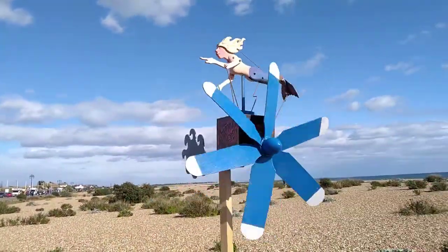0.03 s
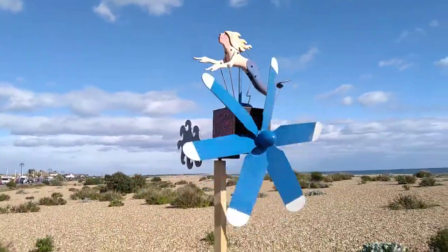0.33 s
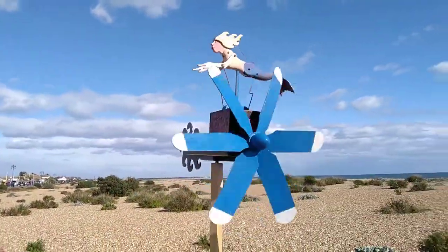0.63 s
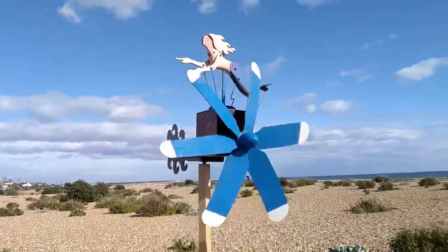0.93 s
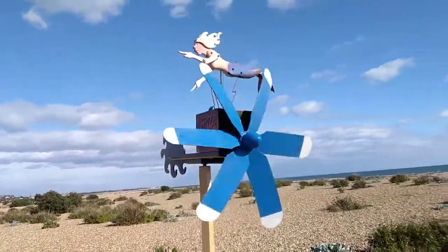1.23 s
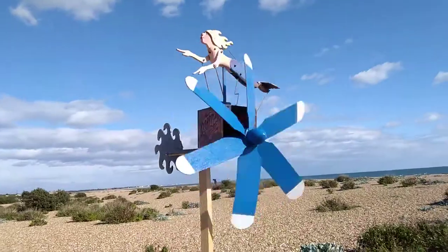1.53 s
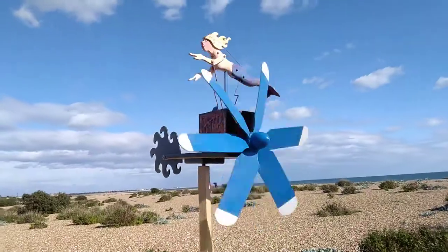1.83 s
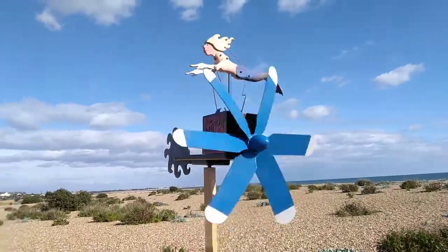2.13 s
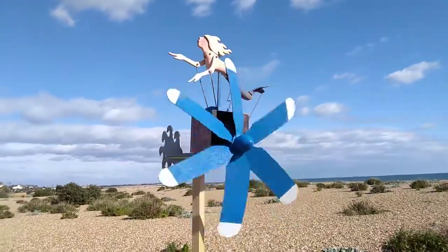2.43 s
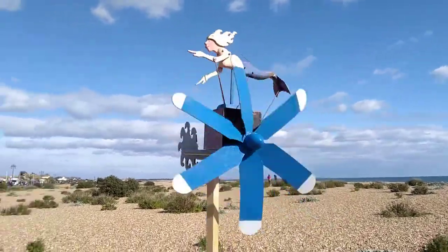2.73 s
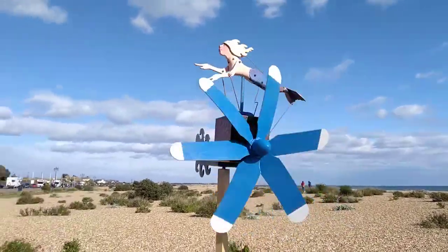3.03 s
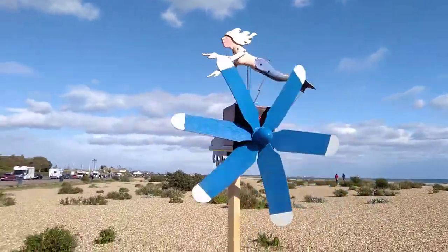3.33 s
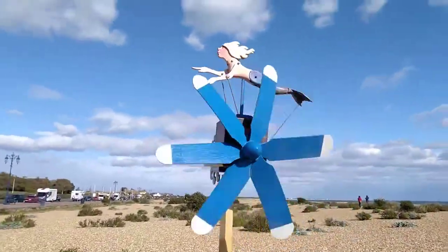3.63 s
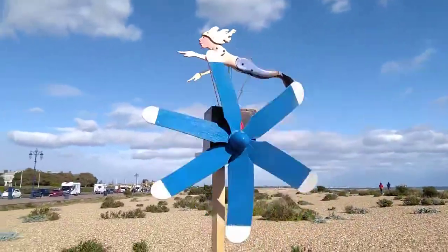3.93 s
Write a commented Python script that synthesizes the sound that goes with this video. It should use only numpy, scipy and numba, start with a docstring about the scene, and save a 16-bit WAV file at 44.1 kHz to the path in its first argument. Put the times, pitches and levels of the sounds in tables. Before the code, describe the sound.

Wind buffets the microphone with a distorted roar, over a whirligig's faint rubbing and ticking.

```python
"""A hard, crackling roar comes first: strong gusts on a shingle beach hit a microphone's two ports
(its openings). Eddies, small swirls of air, buffet each port and overload it, the right one nearly
all the time, which turns the roar to crackle. In two short lulls a rumble is left.
Close by, a wooden whirligig turns in the wind: its crank and wires rub and tick faintly."""
import sys
import numpy as np
from scipy import signal
from scipy.fft import rfft, irfft
from scipy.io import wavfile
from numba import njit

SR = 44100
rng = np.random.default_rng(int(sys.argv[2]) if len(sys.argv) > 2 else 0)


def inscribe(sig):
    """Save sig as 16-bit PCM at rate SR to the path in sys.argv[1].

    A 1-D sig is mono; a 2-D sig holds one channel per row.
    Samples are clipped to [-1, 1] before scaling.
    """
    pcm = np.round(np.clip(np.atleast_2d(sig).T, -1, 1) * 32767)
    wavfile.write(sys.argv[1], SR, pcm.astype(np.int16))


N = 176400

# Levels in the tables are relative. Gusts on the right port: (time [s], pressure [dB], eddy pitch [Hz])
RIGHT_GUSTS = [(0, 1, 313), (0.11, -5.5, 243), (0.22, -6, 220), (0.335, -5.5, 306), (0.41, -1, 256),
               (0.47, -1, 292), (0.535, -2.5, 427), (0.603, -9, 490), (0.616, 0.5, 524), (0.665, -0.5, 474),
               (0.705, 1, 420), (0.76, -8.5, 324), (0.815, -4, 358), (0.9, -4, 373), (0.935, -8, 465),
               (0.99, -3.5, 437), (1.08, -7.5, 520), (1.13, -3, 336), (1.24, -4.5, 420), (1.332, -5, 400),
               (1.348, -26, 270), (1.419, -53, 280), (1.431, -5.5, 377), (1.455, -6, 335),
               (1.468, -30, 300), (1.485, -27.5, 294), (1.503, -17, 230), (1.535, -9.5, 257),
               (1.583, -23, 220), (1.595, -6, 320), (1.63, -9, 366), (1.74, 0.5, 323), (1.83, 3, 230),
               (1.93, -3, 440), (1.96, -22.5, 370), (1.985, 0.5, 390), (2.12, 1, 260), (2.28, 1.5, 466),
               (2.37, -3.5, 480), (2.505, 3.5, 493), (2.545, -7.5, 460), (2.578, -10.5, 353),
               (2.598, -19, 229), (2.64, -31, 226), (2.657, -11.5, 302), (2.708, -24, 282),
               (2.722, -5.5, 295), (2.736, -7.5, 280), (2.752, -40, 200), (2.819, -33, 278),
               (2.828, -1.5, 338), (2.885, -6, 386), (2.91, -2.5, 438), (3.02, 2, 280), (3.13, 0, 398),
               (3.17, 9, 364), (3.255, 7.5, 390), (3.29, 1, 487), (3.37, -7.5, 570), (3.42, -0.5, 496),
               (3.68, 2, 510), (3.725, -7.5, 483), (3.772, -13.5, 467), (3.786, -4, 556), (4, 2.5, 435)]
# Gusts on the sheltered left port: (time [s], pressure [dB])
LEFT_GUSTS = [(0.0, -25.5), (0.25, -24.5), (0.28, -28.5), (0.71, -18), (0.85, -33.5), (0.91, -25.5),
              (1.12, -21.5), (1.16, -30.5), (1.34, -29), (1.41, -20.5), (1.48, -31.5), (1.51, -19),
              (1.59, -25.5), (1.67, -45), (1.69, -31.5), (1.84, -19.5), (2.01, -25.5), (2.13, -19),
              (2.17, -23.5), (2.26, -22.5), (2.41, -32), (2.54, -22), (2.65, -25.5), (2.79, -23),
              (2.86, -29), (2.9, -26.5), (3.28, -15.5), (3.31, -27.5), (3.43, -18), (3.59, -20.5),
              (3.63, -16), (3.81, -23.5), (3.84, -18.5), (4.0, -20.5)]
# Single eddies slap the right port: (time [s], length [s], extra pressure [dB])
EDDY_SLAPS = [(0.097, 0.0048, 8.5), (0.197, 0.0049, 4.5), (0.316, 0.0052, 4), (0.513, 0.0029, 2),
              (0.626, 0.027, 1.5), (0.668, 0.0082, 5), (0.812, 0.0042, 1), (0.946, 0.01, 8),
              (1.480, 0.0052, 19), (1.527, 0.0047, 6.5), (1.597, .009, 6.5), (1.738, 0.01, 2),
              (1.848, 0.002, 5), (2.656, 0.0075, 0.5), (2.721, .006, 3), (3.038, 0.0038, -2),
              (3.267, .007, 8), (3.794, 0.0091, 5)]
# The flow breaks off the right port for a moment: (time [s], length [s], pressure lost [dB])
FLOW_BREAKS = [(0.107, 0.0042, -1), (0.163, 0.0054, 10), (0.206, 0.0068, 0), (0.292, 0.0078, 3),
               (0.482, 0.006, 4), (0.797, 0.0033, 12), (0.862, 0.0088, 6.5), (0.961, 0.015, 7),
               (1.012, 0.0072, 8), (1.143, 0.006, 10), (1.27, 0.0076, 5.5), (1.609, 0.012, 4),
               (1.635, 0.0081, 5.5), (1.705, 0.015, 4), (2.432, 0.03, 4), (2.849, 0.0033, 7.5)]
# Rumble of large eddies: (frequency [Hz], level [dB])
RUMBLE_SPECTRUM = [(15, -8), (35, -5.5), (70, -8.5), (130, -10), (250, -18.5), (500, -26), (1000, -45),
                   (2000, -86)]
# Sizzle of an overloaded port: (frequency [Hz], level [dB])
SIZZLE_SPECTRUM = [(800, 8), (2500, 13), (5000, 8.5), (9000, 0.5), (12500, -6.5), (15000, -32)]
# Far wind and surf: (frequency [Hz], level [dB])
BEACH_SPECTRUM = [(500, 15), (2000, 8.5), (5000, -11), (11000, -13), (13000, -27), (15000, -33)]
# The whirligig's crank rubs: (start [s], length [s], level [dB], share of shrill scraping [0-1])
CRANK_RUBS = [(0.217, 0.041, -44.5, 0.9), (.32, 0.2, -57, .3), (0.537, 0.081, -46, .2),
              (.63, 0.26, -59, 0.1), (0.897, 0.16, -46, 0.07), (1.074, 0.078, -40, 0.3),
              (1.154, 0.17, -53.5, 0.1), (1.382, 0.02, -47, .3), (1.42, 0.03, -42.5, .3),
              (1.532, 0.062, -38, .35), (1.604, 0.19, -55, 0), (1.928, 0.061, -43, 0.4),
              (2.05, 0.3, -51, 0.16), (2.336, 0.26, -49.5, 0.4), (2.496, 0.15, -46.5, 0.26),
              (2.652, 0.16, -55, 0.64), (2.87, 0.086, -47, 0.2), (2.988, 0.096, -45, .4),
              (3.11, 0.19, -44.5, .2), (3.393, 0.14, -50, .2), (3.51, 0.19, -42, 0.4),
              (3.769, 0.11, -45, 0.3)]
# Rustle of rubbing wood: (frequency [Hz], level [dB])
WOOD_SPECTRUM = [(1800, 3), (2600, 4), (3600, 8.5), (4500, 4.5), (6500, 2.5), (10000, -4.5), (12500, -3),
                 (13500, -18), (16000, -36)]
# Rasp of scraping wires: (frequency [Hz], level [dB])
WIRE_SPECTRUM = [(4500, -12), (6300, -1.5), (9500, 2), (11000, 0), (12500, -11)]
# Ticks of the whirligig's linkage: (time [s], level [dB])
LINKAGE_TICKS = [(.866, -16), (1.287, -33), (1.423, -20.5), (2.518, -21), (2.728, -27), (2.802, -33),
                 (3.002, -20), (3.542, -25)]
# Tones the linkage rings with: (frequency [Hz], level [dB], time to fade by 60 dB [s])
LINKAGE_TONES = [(4050, -10, .007), (5300, -15, .007), (6650, -3, 0.0059), (7600, -9, .006),
                 (8800, -8, 0.0055), (10500, -5, 0.0039), (12500, -27, 0.0045)]

TIME = np.arange(N) / SR


def from_db(db):
    """Turn decibels into a gain to multiply by."""
    return 10 ** (np.asarray(db) / 20)


def unit_level(x):
    """Scale a signal so that its average power is 1."""
    return x / np.sqrt(np.mean(x ** 2) + 1e-20)


def in_time(rows):
    """Join a table's points with straight lines: one curve for each column after the time."""
    times, *columns = np.transpose(rows)
    return [np.interp(TIME, times, column) for column in columns]


def colour(x, spectrum):
    """Make some frequencies stronger than others; the result has power 1."""
    hz, db = np.transpose(spectrum)
    grid_hz = np.maximum(np.fft.rfftfreq(N, 1 / SR), 1)
    gain = from_db(np.interp(np.log(grid_hz), np.log(hz), db))
    return unit_level(irfft(rfft(x) * gain, N))


def keep(x, hz, order=1, kind="low"):
    """Keep what lies below hz ("low"), above it ("high") or between two values ("band")."""
    return signal.sosfilt(signal.butter(order, hz, kind, fs=SR, output="sos"), x)


def drift(rate_hz):
    """A smooth random wobble, about 1 in size."""
    return unit_level(keep(rng.standard_normal(N + SR), rate_hz, order=2)[SR:])


@njit
def sweep(x, tuning, damping):
    """A resonance whose centre and width move; returns the band at its centre and the lows."""
    band, low = np.zeros(len(x)), np.zeros(len(x))
    band_memory, low_memory = 0., 0.
    for i in range(len(x)):
        step = tuning[i]
        band[i] = (band_memory + step * (x[i] - low_memory)) / (1 + step * (step + damping[i]))
        low[i] = low_memory + step * band[i]
        band_memory, low_memory = 2 * band[i] - band_memory, 2 * low[i] - low_memory
    return band, low


def eddies(pitch_hz, damping, reach, fine_db, regular_below_hz=574):
    """Swirling air: noise strongest near its pitch, fading steeply above `reach` times that pitch."""
    tuning = np.pi * pitch_hz / SR
    # Slow eddies are more regular, so their hump in the spectrum is narrower.
    width = damping * np.minimum(pitch_hz / regular_below_hz, 1) ** 0.93
    hump = sweep(rng.standard_normal(N), tuning, width)[0] * np.sqrt(width / tuning)
    body = sweep(hump, tuning * reach, np.full(N, np.sqrt(2)))[1]
    return unit_level(body + from_db(fine_db) * hump)  # fine eddies add a little treble


def rumble(wind_db, level_db, follows):
    """Large eddies rumble, following a share of the wind's rise and fall."""
    swing_db = follows * (wind_db - wind_db.mean())
    return from_db(level_db + swing_db) * colour(rng.standard_normal(N), RUMBLE_SPECTRUM)


def overloaded_port(pressure, wind_db, top_hz, limit=0.42, hardness=7.5):
    """A port flattens pressure peaks; while overloaded it sizzles and is deaf to the far beach."""
    passed = (1 + np.abs(pressure / limit) ** hardness) ** (-1 / hardness)  # near 1 in light wind
    flattened = keep(pressure * passed, top_hz, order=2)
    sizzle_db = -32 + 0.17 * wind_db + 2 * drift(69)
    sizzle = (1 - passed) * from_db(sizzle_db) * colour(rng.standard_normal(N), SIZZLE_SPECTRUM)
    beach = passed ** hardness * from_db(-51.5) * colour(rng.standard_normal(N), BEACH_SPECTRUM)
    return keep(flattened + sizzle + beach, hz=13200, order=10)


def right_port(exposure_db=-1.5, octaves_per_db=0.06, flutter_octaves=0.15):
    """This port faces the wind: slaps push its roar up in level and pitch, breaks pull it down."""
    gust_db, eddy_hz = in_time(RIGHT_GUSTS)
    jolt_db = bumps(EDDY_SLAPS) - bumps(FLOW_BREAKS)
    wind_db = gust_db + jolt_db + exposure_db
    pitch_hz = eddy_hz * 2 ** (octaves_per_db * jolt_db + flutter_octaves * drift(73.4))
    buffeting = from_db(wind_db) * eddies(pitch_hz, damping=2.14, reach=1.72, fine_db=-30)
    pressure = buffeting + rumble(wind_db, level_db=-13, follows=0.48)
    return overloaded_port(pressure, wind_db, top_hz=12500)


def left_port(exposure_db=4, octaves_per_db=0.09, flutter_db=1, flutter_octaves=0.47):
    """The sheltered port is muffled: mostly rumble, now and then overloaded."""
    gust_db, = in_time(LEFT_GUSTS)
    wind_db = gust_db + exposure_db
    eddy_hz = 323 * 2 ** (octaves_per_db * (gust_db + 14))  # eddies quicken as the wind rises
    flutter = drift(38.5)  # makes the buffeting louder and higher at once
    pitch_hz = eddy_hz * 2 ** (flutter_octaves * flutter)
    strength = from_db(wind_db + flutter_db * flutter)
    buffeting = strength * eddies(pitch_hz, damping=5.8, reach=2.19, fine_db=-39)
    pressure = buffeting + rumble(wind_db, level_db=-18, follows=0.91)
    return overloaded_port(pressure, wind_db, top_hz=2600)


def bumps(rows):
    """Short bell-shaped swells, in dB at every sample."""
    return sum(db * np.exp(-np.minimum(np.abs(2 * (TIME - centre) / length), 6) ** 2 / 2)
               for centre, length, db in rows)


def crank_rubs(slips_per_s=7500, axle_db=-65.5, right_db=-1, attack_s=0.02, release_s=0.051):
    """A rub is many tiny slips under an uneven force: wood rustles, wire scrapes, hard rubs squeal."""
    wood_gain, wire_gain, squeal_gain = from_db(axle_db), 0, 0  # the axle rustles all the time
    for start, length, db, shrill in CRANK_RUBS:
        rise = (TIME - start) / attack_s
        fall = (start + length - TIME) / release_s + 0.5
        touch = np.clip(np.minimum(rise, fall), 0, 1)
        wood_gain += touch * from_db(db) * np.sqrt(1 - shrill)
        wire_gain += touch * from_db(db) * np.sqrt(shrill)
        squeal_db = -55 + 3.2 * (db + 41)  # grows much faster than the rub itself
        squeal_gain += touch ** 2 * from_db(squeal_db) * (1 - shrill)
    slips = rng.random(N) < slips_per_s / SR
    sides = []
    for side_db in (0, right_db):
        wood = wood_gain * colour(slips * rng.standard_normal(N), WOOD_SPECTRUM)
        wire = wire_gain * wire_scrape(slips)
        squeal = squeal_gain * slip_band(slips, low_hz=14050, high_hz=14750)
        sides.append(from_db(side_db) * (wood + wire + squeal))
    uneven_force = from_db(2.5 * drift(27))
    return np.array(sides) * uneven_force


def wire_scrape(slips, bands=24, uneven_db=5.5, uneven_hz=30):
    """Slips on the wires make a broad rasp; each band of it swells and fades on its own."""
    edges_hz = np.linspace(WIRE_SPECTRUM[0][0], WIRE_SPECTRUM[-1][0], bands + 1)
    rasp = 0
    for low_hz, high_hz in zip(edges_hz, edges_hz[1:]):
        swell = from_db(uneven_db * np.minimum(drift(uneven_hz), 2))
        rasp += swell * slip_band(slips, low_hz, high_hz)
    return colour(rasp, WIRE_SPECTRUM)


def slip_band(slips, low_hz, high_hz):
    """Slips of random strength, heard in one band of frequencies; the result has power 1."""
    return unit_level(keep(slips * rng.standard_normal(N), [low_hz, high_hz], order=2, kind="band"))


def linkage_ticks(contact_s=0.0036, gain_db=-6, right_db=-4):
    """A short, rough contact makes the linkage ring."""
    contact = sum(from_db(db + gain_db) * (TIME >= start) * np.exp(-np.abs(TIME - start) / contact_s)
                  for start, db in LINKAGE_TICKS)
    force = contact / np.sqrt(contact_s * SR / 2) * rng.standard_normal((2, N)) + 1e-18
    ringing = np.zeros((2, N))
    for hz, db, fade_s in LINKAGE_TONES:
        decay, angle = from_db(-60 / (fade_s * SR)), 2 * np.pi * hz / SR  # both per sample
        feedback = [1, -2 * decay * np.cos(angle), decay ** 2]
        ringing += from_db(db) * signal.lfilter([0, np.sin(angle)], feedback, force)
    return ringing * from_db([[0], [right_db]])


def scene():
    """Wind on both ports, with the whirligig close by."""
    return np.array([left_port(), right_port()]) + crank_rubs() + linkage_ticks()


def record(dry, threshold_db=-18.5, cut_per_db=0.62, reaction_s=0.021, top_hz=15600):
    """One gain control turns both channels down in the gusts; the highest treble is cut."""
    power = np.mean(dry ** 2, axis=0)
    memory = np.exp(-1 / (reaction_s * SR))
    recent_power = signal.lfilter([1 - memory], [1, -memory], power, zi=[power.mean()])[0]
    excess_db = np.maximum(10 * np.log10(recent_power) - threshold_db, 0)
    levelled = keep(dry * from_db(-cut_per_db * excess_db), hz=2, kind="high")
    return signal.sosfilt(signal.ellip(10, .1, 80, top_hz, fs=SR, output="sos"), levelled)


dry = scene()
out = record(dry)
inscribe(out)
```